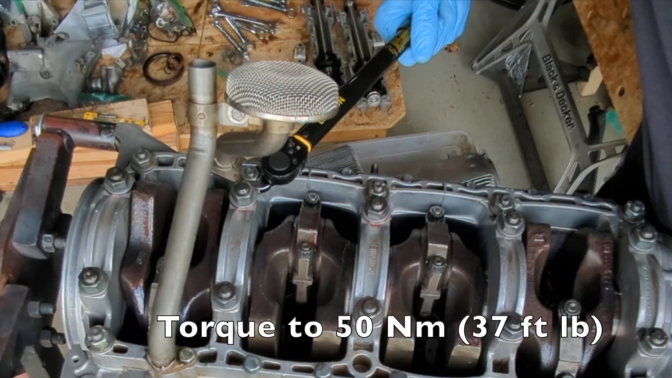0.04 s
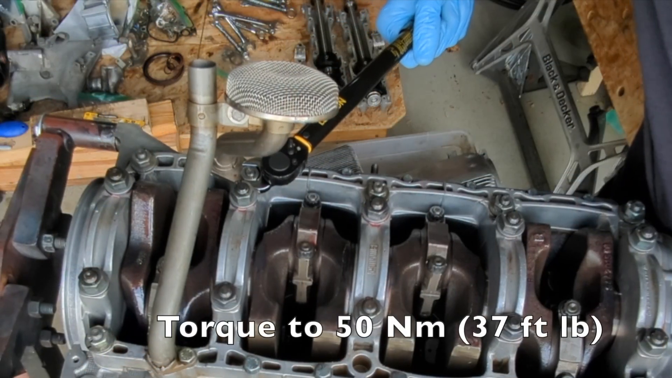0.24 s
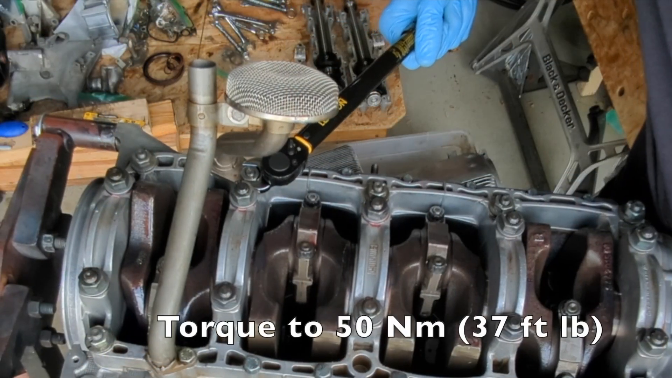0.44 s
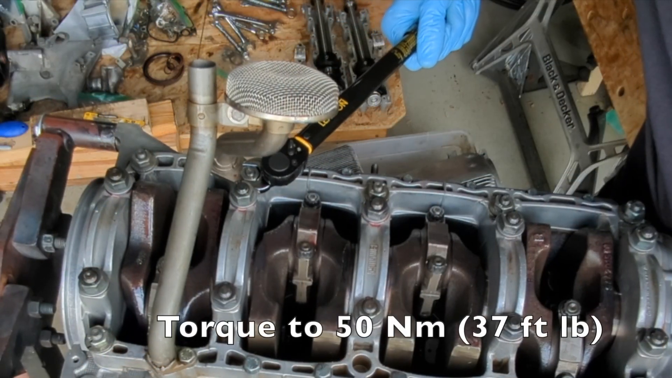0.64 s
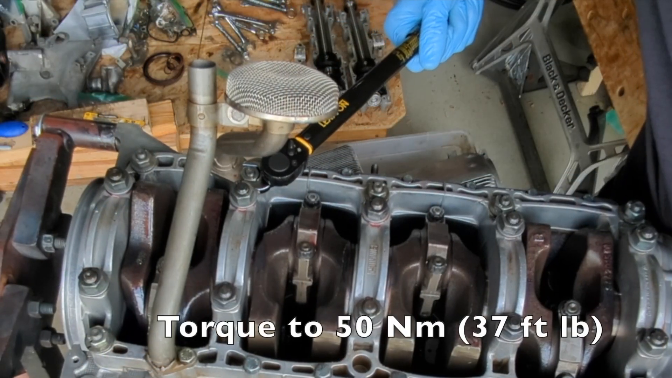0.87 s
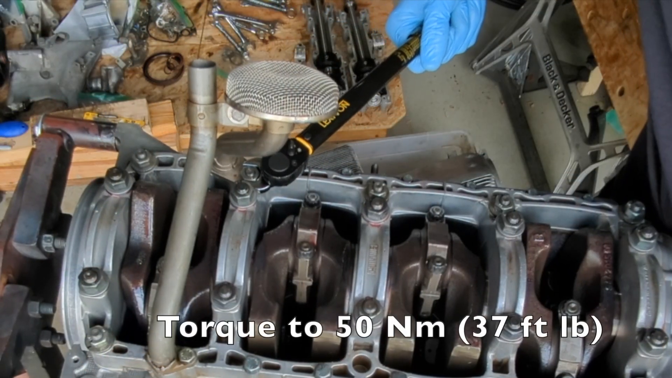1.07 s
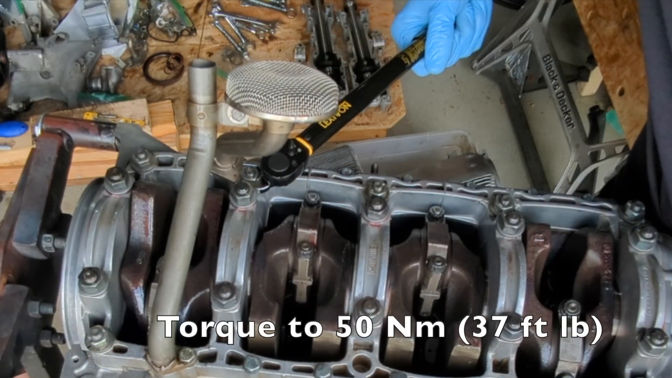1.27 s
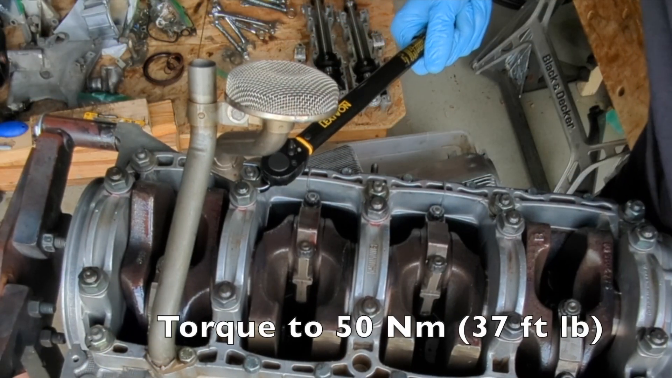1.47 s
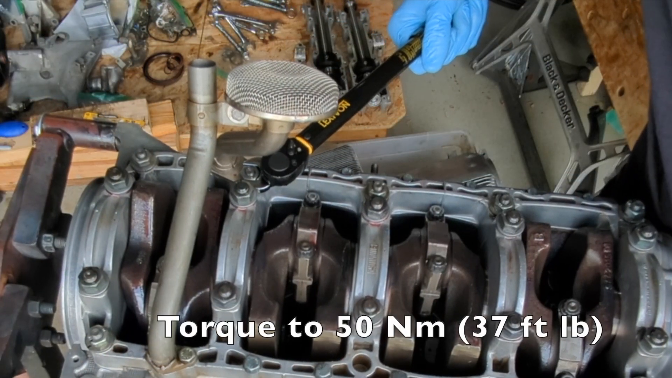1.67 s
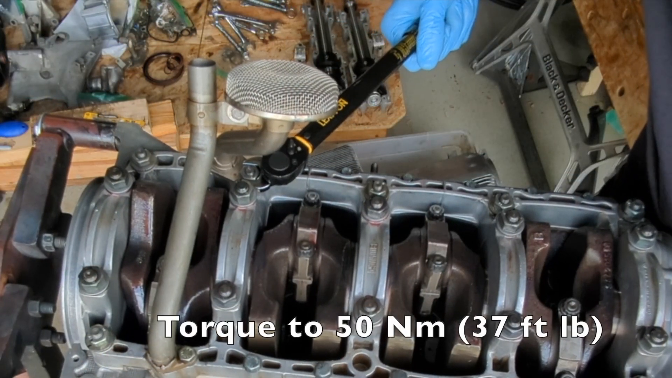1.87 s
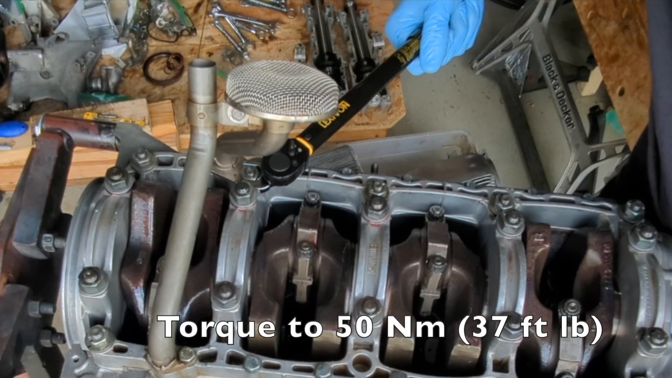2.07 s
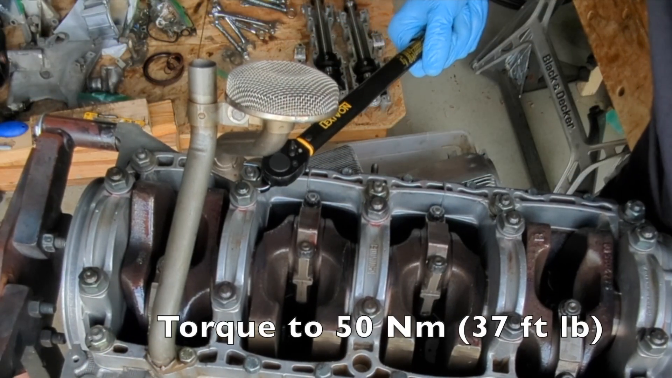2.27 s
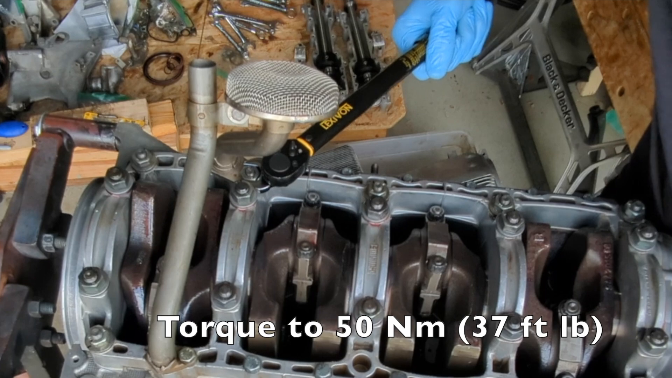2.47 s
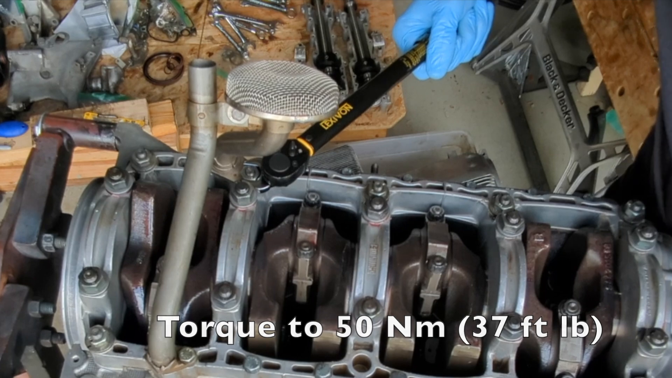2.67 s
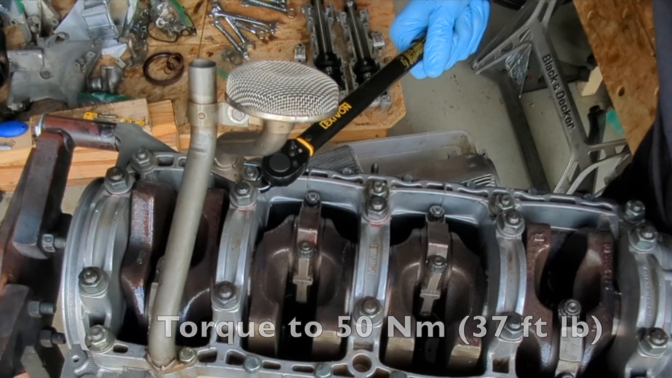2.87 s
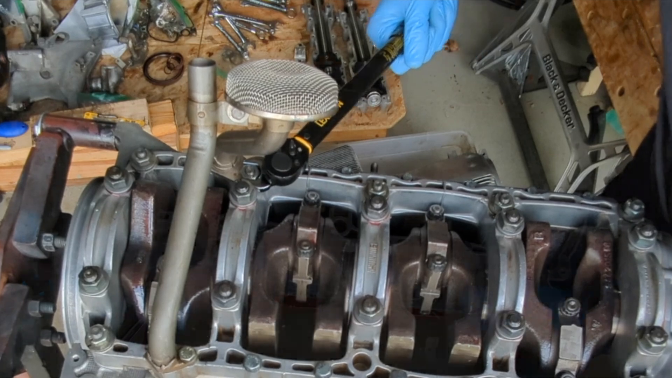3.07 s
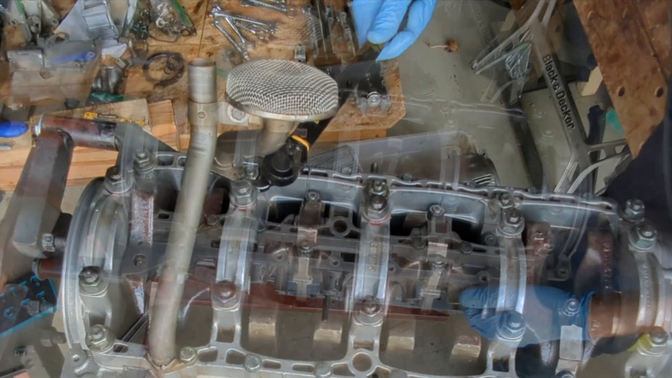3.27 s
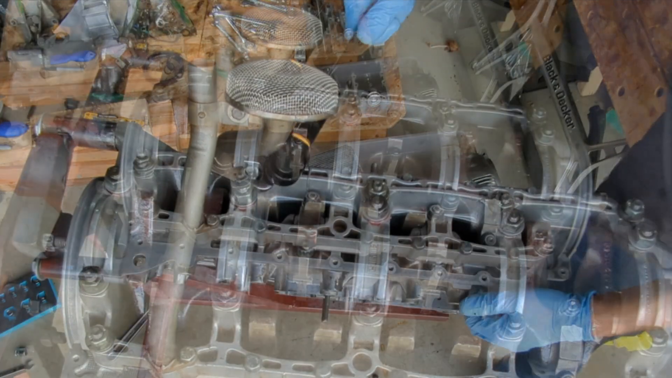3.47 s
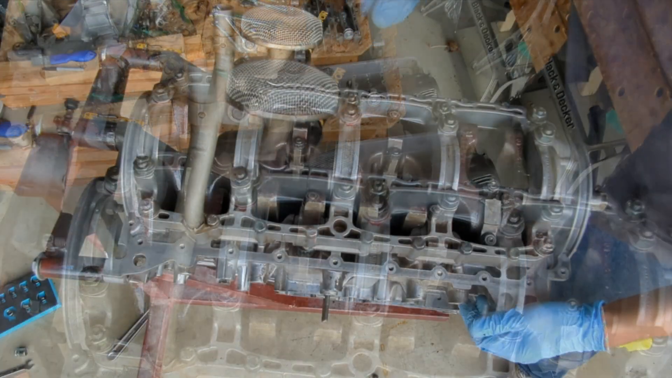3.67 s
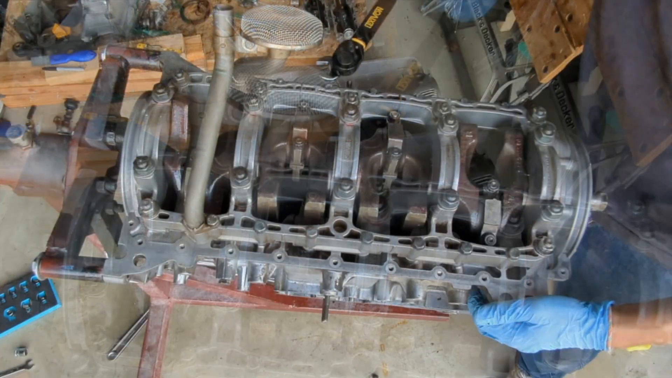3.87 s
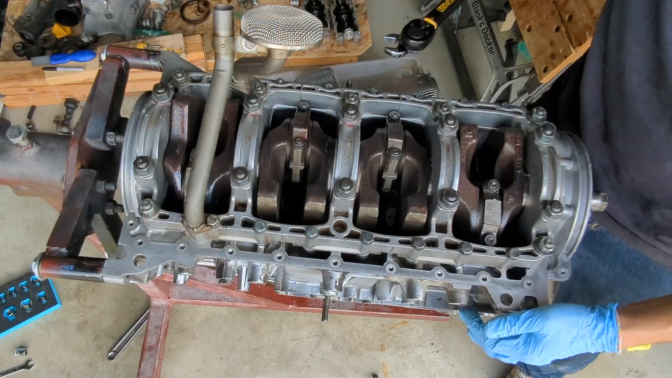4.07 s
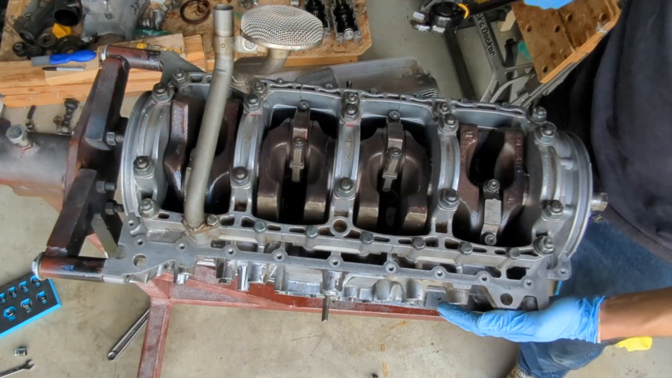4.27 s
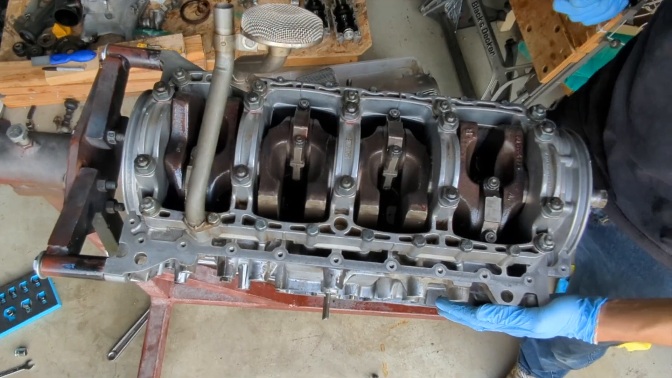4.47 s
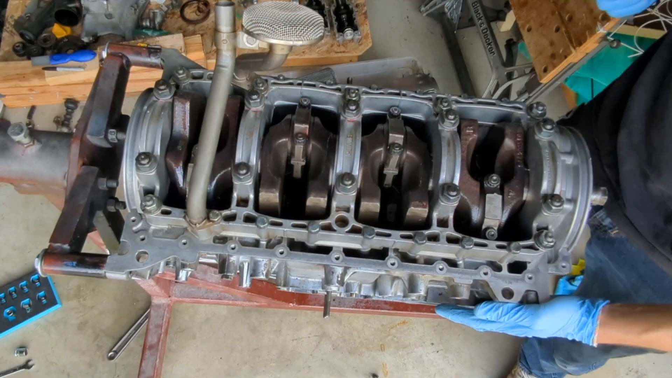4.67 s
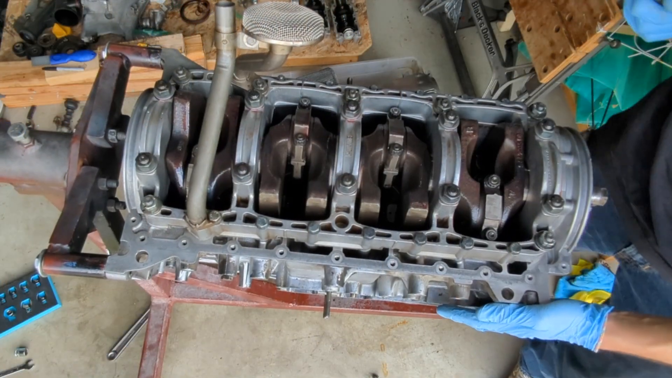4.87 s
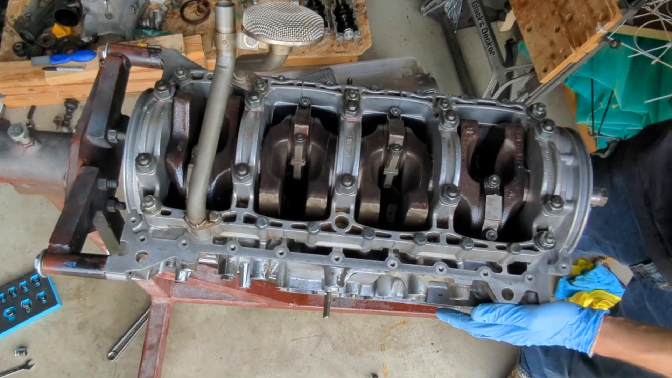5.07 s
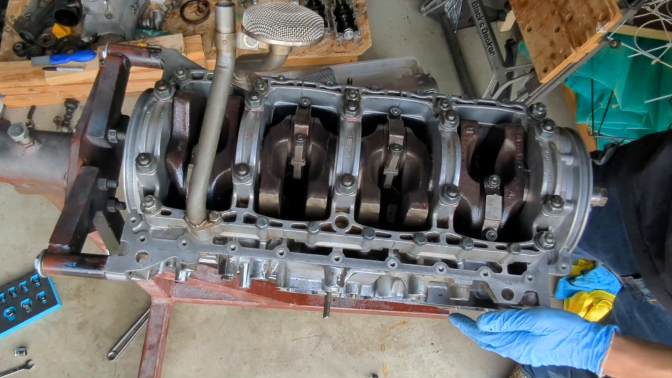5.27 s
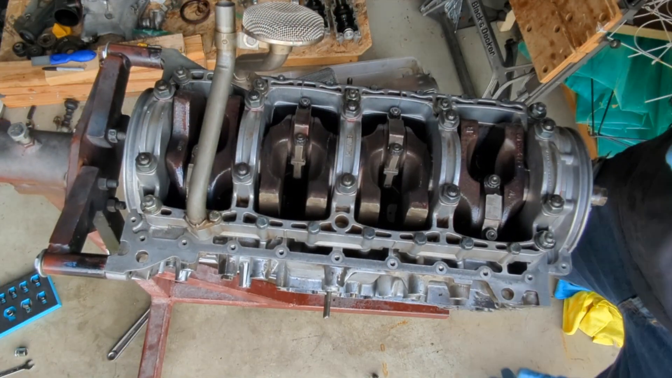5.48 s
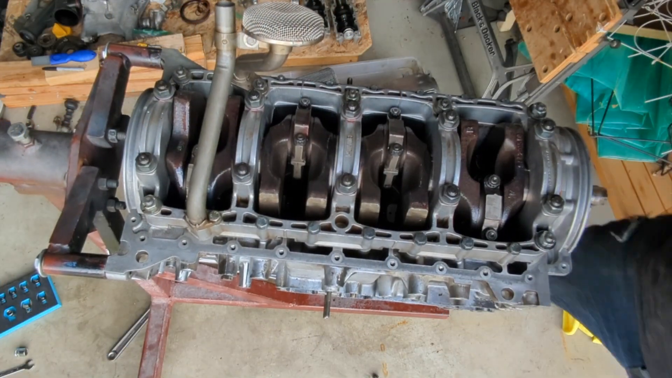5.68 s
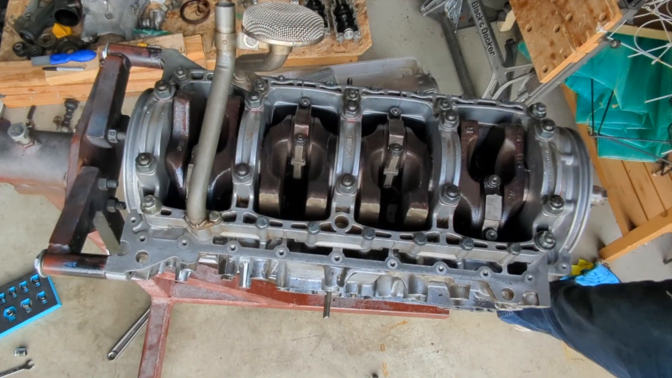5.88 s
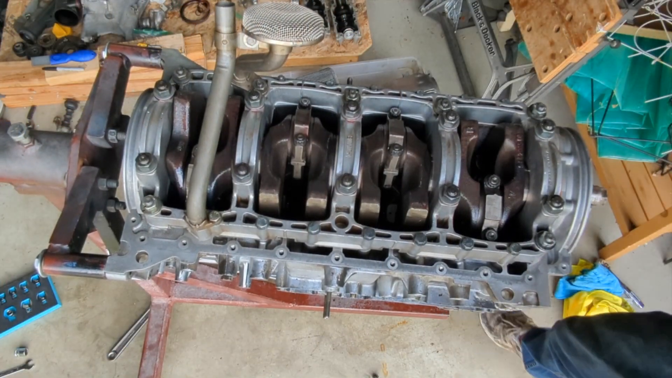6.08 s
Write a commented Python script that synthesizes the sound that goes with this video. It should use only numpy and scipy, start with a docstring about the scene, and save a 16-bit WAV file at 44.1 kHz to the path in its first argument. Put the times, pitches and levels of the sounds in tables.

```python
"""A motor hums with a slow beat and air stirs in a small workshop, first mostly steady, then fuller.
Twice a click-type torque wrench snaps on the bolts of an engine block, which rings on; each time the
wrench is let go it knocks softly back. Then light taps, a brush of cloth, swishing clothes and steps follow.
Sine waves make the hum and, dying away, the rings; coloured noise makes air, snaps, knocks, taps, cloth
and scuffs. All but the hum and air get a room echo."""
import sys
import numpy as np
from scipy import signal
from scipy.fft import rfft, irfft
from scipy.io import wavfile

SR = 44100
rng = np.random.default_rng(int(sys.argv[2]) if len(sys.argv) > 2 else 0)


def persist_wave(psi):
    """Save psi, clipped to +-1, as 16-bit WAV."""
    counts = np.round(np.clip(psi, -1, 1) * 32767).astype(np.int16)
    wavfile.write(sys.argv[1], SR, np.atleast_2d(counts).T)


N = 270333  # length of the scene in samples
T = np.arange(N) / SR  # time [s]


def amp(db):
    """Turns decibels into a gain."""
    return 10 ** (np.asarray(db) / 20)


def unit(x):
    """Scales a sound to an rms of 1."""
    return x / np.sqrt(np.mean(x ** 2) + 1e-20)


def read(points, hz):
    """Reads a table between its points, along a log-frequency axis."""
    f, value = np.transpose(points)
    return np.interp(np.log(hz + 1), np.log(f + 1), value)


def add(mix, s, sound):
    """Mixes a stereo sound in at time s."""
    part = mix[:, round(s * SR):][:, :sound.shape[1]]
    part += sound[:, :part.shape[1]]


def colour(x, points, keep_power=True, size=4096):
    """Gives a sound the spectrum in the table, with a filter that never acts ahead of time."""
    hz = abs(np.fft.fftfreq(size, 1 / SR))
    log_gain = np.log(amp(read(points, hz)))
    # this phase packs the filter's energy as early as possible
    response = np.exp(np.conj(signal.hilbert(log_gain)))
    taps = np.fft.ifft(response).real[:size // 2]
    if keep_power:
        taps = taps / np.linalg.norm(taps)
    return signal.oaconvolve(x, taps[None], axes=1)[:, :x.shape[1]]


# how alike left and right are in spread-out noise: (frequency [Hz], likeness [-1..1])
EAR_LIKENESS = [(60, 0.9), (130, 0.96), (290, 0.53), (640, 0.44), (1400, -0.29), (3000, 0.13),
                (15000, -0.34)]


def diffuse(points):
    """Steady coloured stereo noise of rms 1, most alike in both ears in the bass."""
    hz = np.fft.rfftfreq(N, 1 / SR)
    a, b = rfft(rng.standard_normal((2, N)))
    same = np.clip(read(EAR_LIKENESS, hz), -1, 1)
    left_right = np.array([a, same * a + np.sqrt(1 - same ** 2) * b])
    return unit(irfft(left_right * amp(read(points, hz)), N))


def waver(rate_hz):
    """Random motion of rms 1 that has little above rate_hz."""
    hz = np.fft.rfftfreq(N, 1 / SR)
    spectrum = rfft(rng.standard_normal(N)) * np.exp(-(hz / rate_hz) ** 2)
    return unit(irfft(spectrum, N))


LEFT_LAG_S = .00011  # the waves of a ring reach the left ear this much later


def ring(modes, rise, scatter=0):
    """Adds up dying tones; scatter gives them differing phases in the two ears, as from a large body."""
    t = T[:SR]
    arrival = t - np.array([[LEFT_LAG_S], [0]])
    out = np.zeros((2, SR))
    for hz, db, t60 in modes:
        phase = rng.random() + scatter * rng.random((2, 1))
        out += amp(db - 60 * t / t60) * np.sin(2 * np.pi * (hz * arrival + phase))
    return out * (1 - np.exp(-t / rise))


def chatter(length, rise, after_db, after_t60):
    """A brief noise burst of tiny impacts, then their weaker scatter from things nearby."""
    t = T[:SR]
    burst = np.exp(-(t / length) ** 2)
    scatter = amp(after_db - 60 * t / after_t60)
    return rng.standard_normal((2, len(t))) * (burst + scatter) * (1 - np.exp(-t / rise))


# how long the room's echo lasts: (frequency [Hz], time to fall by 60 dB [s])
ROOM_DECAY = [(150, .3), (500, 0.53), (1200, 0.51), (3000, .4), (5000, 0.38), (8000, 0.32), (12000, 0.24),
              (16000, .15)]


def workshop(x, wet_db, build):
    """Adds a dense echo that builds up, then dies at a different speed in each band."""
    hz, t, z = signal.stft(rng.standard_normal((2, SR)), SR, nperseg=256)
    fade = amp(-60 * t / read(ROOM_DECAY, hz)[:, None])
    tail = signal.istft(z * fade, SR, nperseg=256)[1][:, :SR]
    tail = tail * (1 - np.exp(-(T[:SR] / build) ** 2))
    tail = tail / np.linalg.norm(tail, axis=1, keepdims=True)
    return x + amp(wet_db) * signal.fftconvolve(x, tail, axes=1)[:, :N]


# left against right on the mechanic's side, at amount 1: (frequency [Hz], left minus right [dB])
SIDE_BALANCE = [(200, -1), (700, -6.5), (1300, -5.5), (3000, -6.5), (4500, -11.5), (6000, -13), (9000, -15),
                (12000, -9), (15000, -3)]


def to_right(x, amount):
    """Leans a sound to the right: softer on the left and louder on the right, most in the treble."""
    left_tilt = [(hz, amount * db / 2) for hz, db in SIDE_BALANCE]
    right_tilt = [(hz, -amount * db / 2) for hz, db in SIDE_BALANCE]
    left = colour(x[[0]], left_tilt, keep_power=False)
    right = colour(x[[1]], right_tilt, keep_power=False)
    return np.vstack([left, right])


# tones of the turning shaft: (multiple of the shaft speed, level [dB rms])
SHAFT_ORDERS = [(1, -66), (2, -61), (3, -76.5), (4, -76), (5, -78.5), (6, -81), (11, -83.5)]
# colour of the low rumble: (frequency [Hz], relative level [dB per Hz])
RUMBLE_COLOUR = [(20, -28.5), (40, -9.5), (57, 0), (85, 5.5), (120, 1), (145, -3.5), (180, -3.5),
                 (220, -13.5), (300, -32), (600, -36), (2000, -68.5)]
SHAFT_HZ, MAINS_BUZZ_HZ = 58.67, 119.93
BEAT_CREST_S = .48  # moment when shaft and buzz tones line up, apart from the shaft's small wander


def motor():
    """The shaft slips behind the mains, so its second order beats slowly with the magnetic buzz."""
    t = T - BEAT_CREST_S
    turns = SHAFT_HZ * t + 0.0069 * waver(rate_hz=3.2)  # the shaft wanders a little
    shaft = sum(amp(db) * np.cos(2 * np.pi * round(k) * turns) for k, db in SHAFT_ORDERS)
    buzz = amp(-51.0) * np.cos(2 * np.pi * MAINS_BUZZ_HZ * t)
    buzz_octave = amp(-85.5) * np.cos(4 * np.pi * MAINS_BUZZ_HZ * t)
    rumble = amp(-57.5) * diffuse(RUMBLE_COLOUR)
    return np.sqrt(2) * (shaft + buzz + buzz_octave) + rumble  # sqrt(2) turns rms into peak


# colour of the steady air: (frequency [Hz], relative level [dB per Hz])
AIR_COLOUR = [(100, -5.5), (280, -3), (500, 3.5), (680, -0.5), (900, 3.5), (1300, -3), (1700, -9.5),
              (2050, -13), (2600, -22.5), (4000, -26), (7000, -33), (13200, -33), (14000, -51)]
# colour of the growing midrange noise: (frequency [Hz], relative level [dB per Hz])
STIR_COLOUR = [(150, -23), (450, 8.5), (750, -1), (1200, -1), (2200, -8), (4000, -17.5), (6500, -26.5),
               (8000, -34), (13000, -35), (14200, -54.5)]
STIR_DB, STIR_START_DB = -61.5, -27  # full level, and start relative to it [dB]
STIR_RISE_S = 4.4  # time to grow evenly to the full level, which then holds


def shop_air():
    """Steady air noise, under a wavering midrange noise that grows and then holds."""
    growth = np.interp(T, [0, STIR_RISE_S], [amp(STIR_START_DB), 1])
    flicker = amp(1.0 * waver(rate_hz=12))
    stir = amp(STIR_DB) * growth * diffuse(STIR_COLOUR) * flicker
    return amp(-63.5) * diffuse(AIR_COLOUR) + stir


# the wrench breaks over: (time [s], level [dB], length of the snap [s])
SNAP_EVENTS = [(1.2379, 0, .0042), (2.4629, 0, .0046)]
# colour of the snap: (frequency [Hz], relative level [dB per Hz])
CRACK_COLOUR = [(100, -31), (300, -18.5), (620, -15), (900, -1), (1700, -5.5), (2400, 1), (3000, 1),
                (4200, 1), (6300, -2.5), (8000, -8), (11000, -1), (13200, -1.5), (14000, -15.5),
                (16000, -21.5)]
# tones of the hand-damped wrench tube: (frequency [Hz], relative level [dB], time to fall by 60 dB [s])
TUBE_MODES = [(1045, -15, .05), (1180, -21, .05), (1305, -20, .05), (1500, -20, .035), (2360, -19, .03),
              (2810, -4, .04), (3030, -5, .03), (3330, 0, .035), (3610, -5, .035), (4630, -11, .02),
              (5330, -8, .018), (5500, -8, .018), (7280, -4, .018), (7670, -15, .035), (8330, -17, .03),
              (9910, -16, .03), (10900, -12, .02), (12160, -10, .035), (12800, -9, .025)]
# tones of the engine block and its crankshaft: (frequency [Hz], relative level [dB], time to fall by 60 dB [s])
BLOCK_MODES = [(903, -13, .4), (1090, -9, .36), (1233, -5, .42), (1292, -4, .48), (1823, -10, .35),
               (2200, -16, .3), (2265, -16, .35), (2620, -10, .35), (2650, -10, .35), (2735, -12, .35),
               (2812, 1, .4), (2953, -1, .53), (3081, 0, .5), (3120, -4, .4), (3168, -6, .42),
               (3212, -2, .45), (3250, -6, .52), (3338, -6, .45), (3367, -3, .42), (3445, -8, .42),
               (3500, -7, .42), (3590, -3, .42), (3712, -3, .34), (4005, -11, .26), (4500, -13, .23),
               (5243, -12, .27), (5324, -12, .27), (6126, -12, .28), (7230, -10, .2), (7477, -9, .23)]
# tones of the engine stand: (frequency [Hz], relative level [dB], time to fall by 60 dB [s])
STAND_MODES = [(244, -9.5, 0.068), (320, 1, 0.05), (344, -3.5, 0.045), (412, -8.5, .2), (451, -4, 0.071),
               (540, -12.5, 0.11)]


def wrench():
    """The head snaps against its tube, which rings briefly; the socket passes the blow to block and stand."""
    snap, block = np.zeros((2, 2, N))
    tube_ring = ring(TUBE_MODES, rise=0.0011)
    block_ring = ring(BLOCK_MODES, rise=.003, scatter=0.96)
    stand_ring = ring(STAND_MODES, rise=0.0084)
    for s, db, length in SNAP_EVENTS:
        burst = chatter(length, rise=0.0002, after_db=-5.0, after_t60=0.13)
        crack = colour(burst, CRACK_COLOUR)
        add(snap, s - .0013, amp(db - 44.5) * crack)  # the toggle starts to slip just before it lets go
        add(snap, s, amp(db - 29) * crack + amp(db - 20.0) * tube_ring)
        add(block, s, amp(db - 47.0) * block_ring)
        add(block, s + 0.0054, amp(db - 40.5) * stand_ring)  # the stand is slow to take up the blow
    snap = to_right(workshop(snap, wet_db=-12.0, build=0.0017), amount=0.77)
    block = to_right(workshop(block, wet_db=-15.5, build=.012), amount=.75)
    return snap + block


# the wrench resets as the pull eases: (time [s], level [dB])
RESET_EVENTS = [(1.7153, -47), (2.8931, -46)]
# colour of the dull knock: (frequency [Hz], relative level [dB per Hz])
KNOCK_COLOUR = [(100, -29), (350, 6), (650, -4), (1100, 4), (1800, -5), (3000, -6), (3800, -14.5),
                (4400, -29), (5600, -36), (7000, -36), (15000, -54)]


def resets():
    """The spring pushes the head back into its seat with a dull knock."""
    out = np.zeros((2, N))
    for s, db in RESET_EVENTS:
        burst = chatter(length=0.0019, rise=0.00071, after_db=-3.0, after_t60=0.12)
        add(out, s, amp(db) * colour(burst, KNOCK_COLOUR))
    return to_right(workshop(out, wet_db=-13, build=0.0059), amount=0.77)


# light taps, and at 5.2 s a longer brush of cloth:
# (time [s], level [dB], centre of the hump [Hz], brighter part against the hump [dB], length [s])
TOUCH_EVENTS = [(3.061, -69, 4670, -10, 0.0026), (3.278, -57.5, 2220, -28, 0.0035),
                (3.368, -59.5, 4180, -5, 0.005), (3.407, -55.5, 2080, -26, 0.0031),
                (3.505, -61.5, 3800, -6.5, .003), (4.226, -70, 4640, -7, 0.0068),
                (4.81, -57, 2720, -22, .003), (4.866, -58, 2770, -16, 0.0017),
                (4.884, -62.5, 4150, 1, 0.0021), (5.203, -64.5, 4400, -19, 0.059),
                (5.608, -60.5, 6100, -8, 0.0025)]
# colour of the brighter part: (frequency [Hz], relative level [dB per Hz])
BRIGHT_COLOUR = [(200, -28), (1500, -12), (3000, -5), (4200, 0), (8000, -3), (13000, -4), (14500, -12),
                 (16000, -22)]
# broad hump of a touch: (multiple of its centre frequency, relative level [dB per Hz])
TOUCH_HUMP = [(.25, -22), (.7, -11), (1, 0), (1.3, -12), (2, -26), (4, -42)]


def light_touches():
    """Small things tap lightly and cloth brushes once, each a short noise with a broad hump."""
    out = np.zeros((2, N))
    for s, db, hz, bright_db, length in TOUCH_EVENTS:
        contact = chatter(length, rise=0.00099, after_db=-14, after_t60=0.091)
        hump = [(multiple * hz, gain_db) for multiple, gain_db in TOUCH_HUMP]
        bright = amp(bright_db) * colour(contact, BRIGHT_COLOUR)
        add(out, s, amp(db) * (bright + colour(contact, hump)))
    return to_right(workshop(out, wet_db=-11, build=0.0035), amount=1.0)


STROKE_SHAPE = 1.96  # speed over a stroke: 1 = pointed, 2 = a round bell


def stroke(s, half_length):
    """Speed of the cloth, 0 to 1: it gathers, peaks at time s and dies away."""
    return np.exp(-(abs(T - s) / half_length) ** STROKE_SHAPE)


def catches(per_second, fade):
    """Sparse little slips of the cloth, each a quick jump that fades: a gain of rms 1."""
    slips = (rng.random(N) < per_second / SR) * np.minimum(rng.exponential(1, N), 3)
    jumps = signal.lfilter([1], [1, -np.exp(-1 / (fade * SR))], slips)
    return unit(1 + 0.29 * jumps)


# strokes of cloth on cloth: (time of fastest motion [s], level [dB], half length [s],
# fizz of the weave against the stroke [dB], centre of the rasp [Hz], garment)
SWISH_EVENTS = [(3.373, -67, 0.042, -26, 2270, "sleeve"), (3.547, -52.5, 0.035, -14, 2320, "sleeve"),
                (3.592, -53.5, 0.03, -9, 2920, "sleeve"), (3.652, -52, 0.036, -1, 2470, "sleeve"),
                (4.94, -67, 0.13, -28, 1900, "trousers"), (5.08, -56.5, 0.029, -9, 3900, "trousers"),
                (5.275, -59.5, 0.044, 1, 3580, "trousers"), (5.358, -60, 0.026, -14, 2200, "trousers"),
                (5.458, -58.5, 0.044, -2.5, 1890, "trousers"), (5.718, -61, 0.13, -11, 2010, "trousers"),
                (5.906, -63, 0.1, -6, 2210, "trousers"), (6.105, -67.5, 0.11, 0, 2900, "trousers")]
# colour of the sleeve: (frequency [Hz], relative level [dB per Hz])
SLEEVE_COLOUR = [(150, -18), (600, -5), (1200, -1.5), (1800, 1.5), (2500, 1.5), (3300, -4.5), (4000, -10.5),
                 (4800, -19), (7500, -25), (12500, -23.5), (15500, -25)]
# colour of the trousers: (frequency [Hz], relative level [dB per Hz])
TROUSERS_COLOUR = [(100, 4), (300, 13.5), (600, -0.5), (1200, 3.5), (2200, 3), (3500, -4), (6500, -18),
                   (8000, -35), (12500, -26), (15500, -36)]
# colour of the weave's fizz: (frequency [Hz], relative level [dB per Hz])
FIZZ_COLOUR = [(500, -24), (2000, 6.5), (3500, 0), (6000, -2.5), (8000, -5.5), (12500, -3.5), (15500, -12)]
FIZZ_POWER = 1.34  # the fizz grows with this power of the speed
RASP_DB, RASP_OCTAVES = -6.5, 0.23  # rasp level against the stroke [dB], half width of its band [octaves]


def clothes():
    """Fabric slides in uneven catches; its ribs rasp, and the weave fizzes most near full speed."""
    power = {"sleeve": np.zeros(N), "trousers": np.zeros(N)}
    fizz_power = np.zeros(N)
    rasp = np.zeros((2, N))
    for s, db, half_length, fizz_db, hz, garment in SWISH_EVENTS:
        speed = stroke(s, half_length)
        power[garment] += (amp(db) * speed) ** 2
        fizz_power += (amp(db + fizz_db) * speed ** FIZZ_POWER) ** 2
        edges = [hz / 2 ** RASP_OCTAVES, hz * 2 ** RASP_OCTAVES]
        band = signal.butter(2, edges, "bandpass", fs=SR)
        ribs = unit(signal.lfilter(*band, rng.standard_normal((2, N))))
        rasp += amp(db + RASP_DB) * speed * ribs
    sleeve = diffuse(SLEEVE_COLOUR) * np.sqrt(power["sleeve"])
    trousers = diffuse(TROUSERS_COLOUR) * np.sqrt(power["trousers"])
    weave = diffuse(FIZZ_COLOUR) * np.sqrt(fizz_power) * amp(2 * waver(rate_hz=830))
    rustle = (sleeve + trousers + rasp + weave) * catches(per_second=170, fade=0.0017)
    return to_right(workshop(rustle, wet_db=-7.5, build=0.0073), amount=0.69)


# shoes on the concrete: (time [s], level [dB], length of the scuff [s], heel thump against the scuff [dB])
STEP_EVENTS = [(3.715, -52, 0.0064, 5), (5.455, -57, 0.042, -19), (5.604, -51, 0.0046, 2),
               (5.619, -50.5, 0.0043, -15), (5.688, -62, 0.009, -5), (5.765, -52.5, 0.0085, -5)]
# colour of the scuff: (frequency [Hz], relative level [dB per Hz])
SHOE_COLOUR = [(60, 6), (250, -26), (500, 7), (900, 4), (1400, 2.5), (2500, -10), (4500, -45), (15000, -25)]


def steps():
    """The heel thumps as two short low tones and the soft sole scuffs the floor."""
    out = np.zeros((2, N))
    for s, db, length, heel_db in STEP_EVENTS:
        burst = chatter(length, rise=0.00056, after_db=-5.5, after_t60=0.11)
        scuff = colour(burst, SHOE_COLOUR)
        thump = ring([(485, 1.5, 0.054), (280, -13, 0.025)], rise=.001)
        add(out, s, amp(db) * (scuff + amp(heel_db) * thump))
    return workshop(out, wet_db=-5.0, build=0.0022)


def scene():
    """All sources over the hum and moving air of the shop."""
    background = (motor() + shop_air()) * amp([[-.25], [.25]])  # a touch louder on the right
    return background + wrench() + resets() + light_touches() + clothes() + steps()


EDGE_HZ = 15800  # upper limit of the sound


def record(dry):
    """Filters away the treble above the upper limit."""
    low_pass = signal.firwin(511, EDGE_HZ, window=("kaiser", 9), fs=SR)
    return signal.oaconvolve(dry, low_pass[None], "same", axes=1)


dry = scene()
out = record(dry)
persist_wave(out)
```